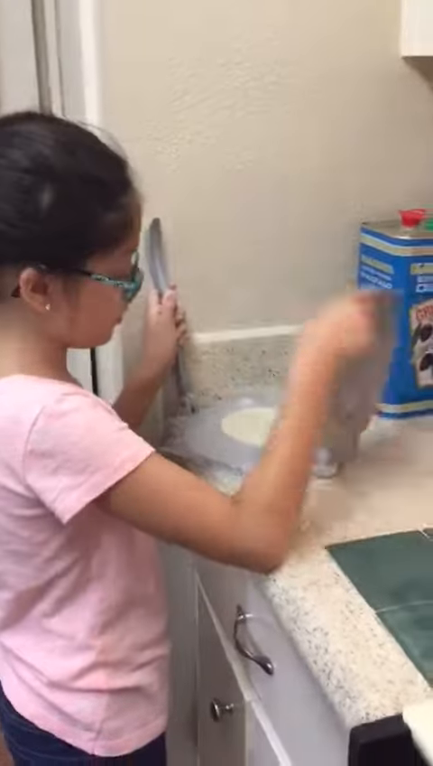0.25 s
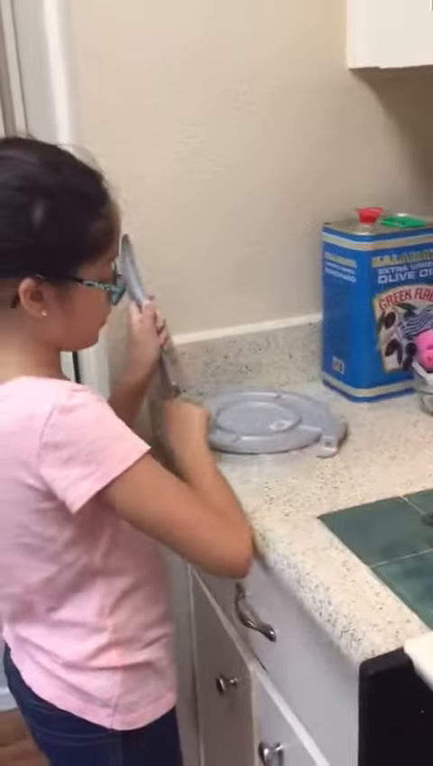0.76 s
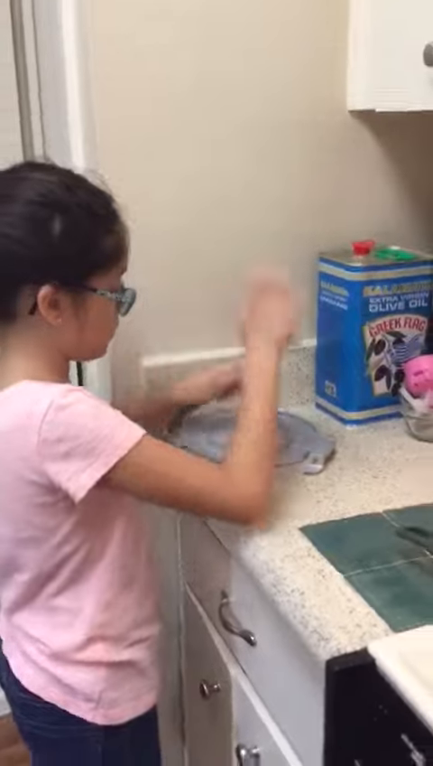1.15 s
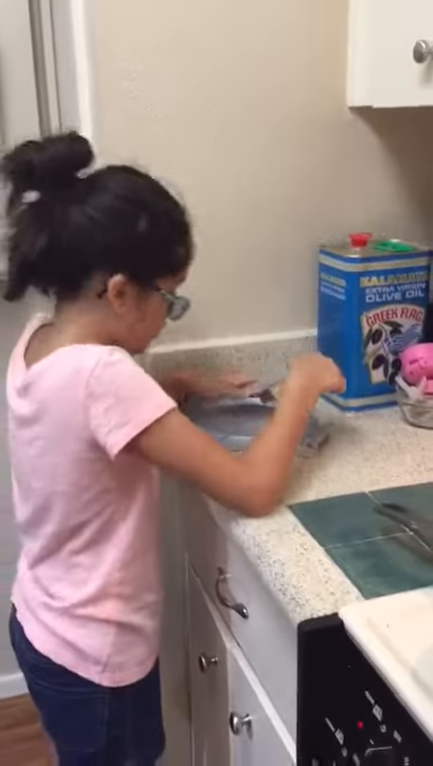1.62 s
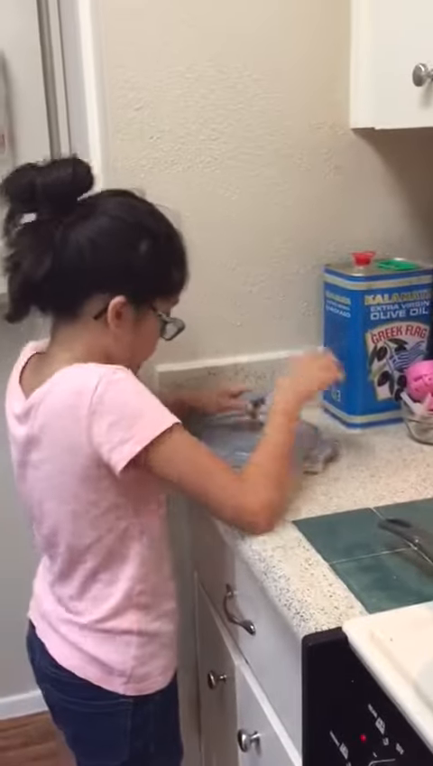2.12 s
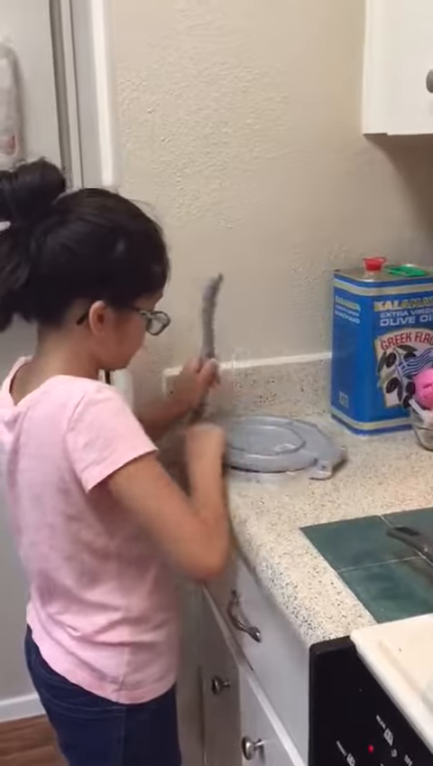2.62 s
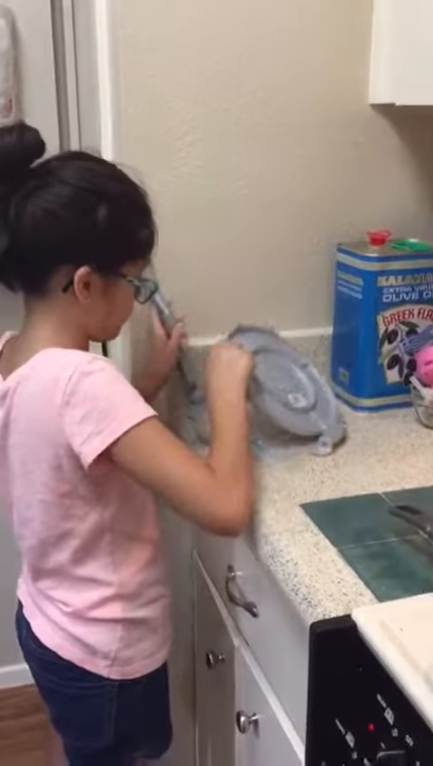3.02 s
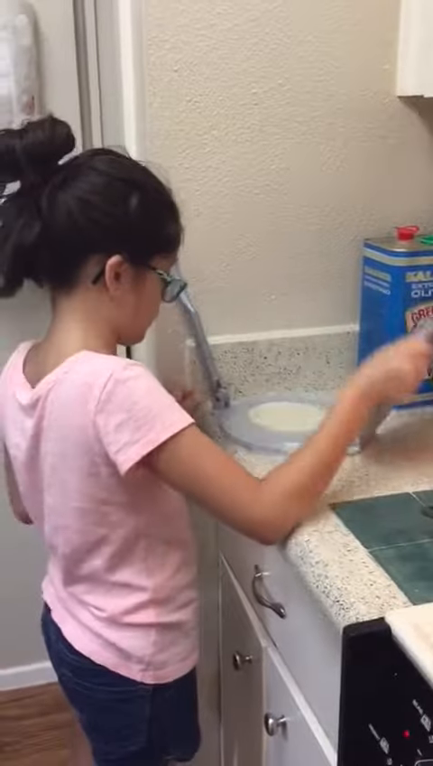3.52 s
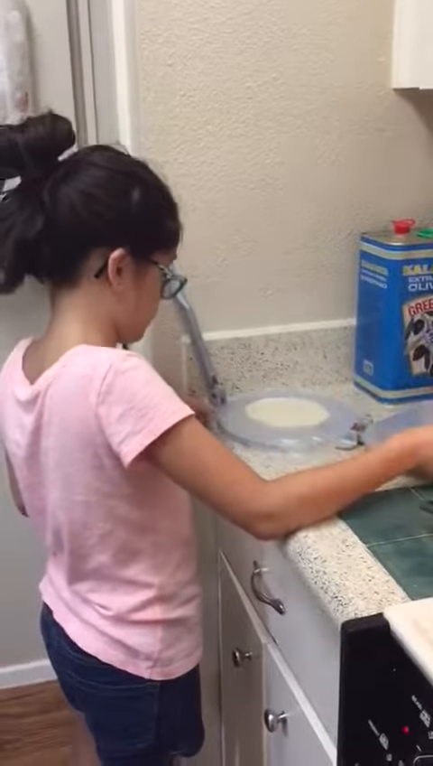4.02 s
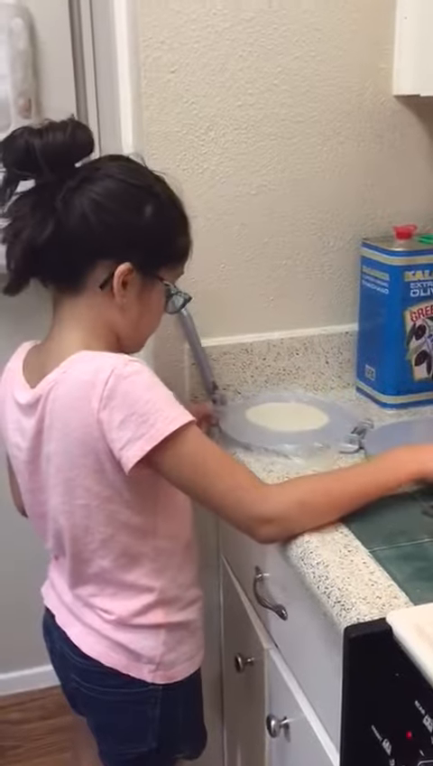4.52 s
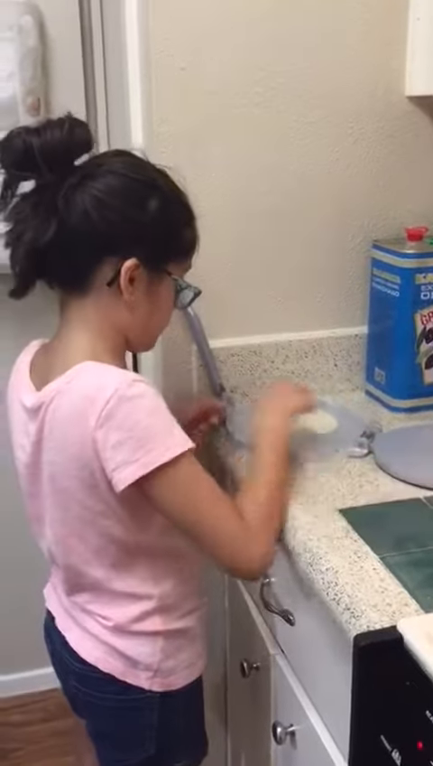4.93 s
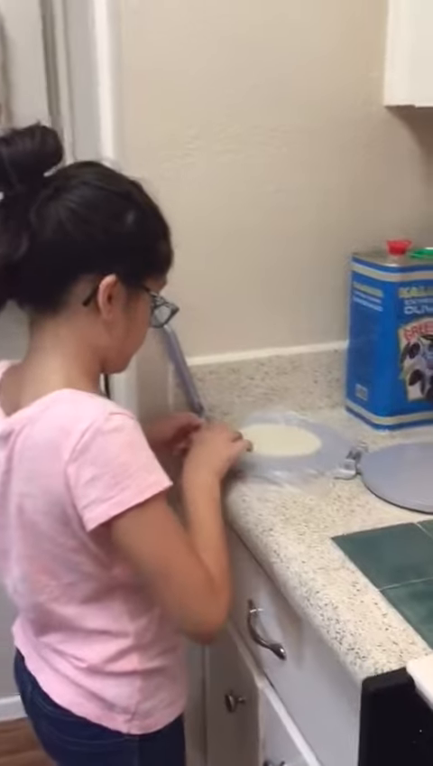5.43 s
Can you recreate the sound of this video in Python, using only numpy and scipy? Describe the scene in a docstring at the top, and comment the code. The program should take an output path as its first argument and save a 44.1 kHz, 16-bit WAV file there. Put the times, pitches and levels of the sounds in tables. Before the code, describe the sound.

A quiet kitchen with a low motor hum and soft air noise; mono, close to mid distance, short dense reflections from hard walls. From 0 to 0.3 s a dry metal hinge gives a high chirp, then a nasal squeal sliding into a rough, slowing creak. At 0.36-0.45 s the lid clacks, with a short squeak and thin, very high squeals until 0.7 s. A firm clack with a thump and plastic snap comes at 0.82 s, and a rattling cluster with a scrape at 1.3 s. Near-quiet until a double clack at 2.23 s, small knocks at 2.5-2.85 s and a sharp clack at 2.98 s. Around 3.5 s the hinge squeaks briefly and more softly; faint gritty grinding and ticks follow at 3.8-4.2 s. A clack at 4.57 s leads to the loudest ringing metal bang at 4.7 s, then faint plastic rustling until 5.7 s.

```python
"""A cast metal tortilla press is closed, levered down on dough and opened again on a kitchen counter.
Over a motor hum the dry hinge squeals and creaks by stick-slip friction as the lid swings over.
Lid and lever then clack as struck modes; plastic sheets rustle in fine snaps and the feet grate.
Later the hinge squeals again and grates, the lid drops open with a bang, and rustling ends the scene.
Hard walls reflect the clacks and the friction sounds in a dense decaying tail."""
import sys
import numpy as np
from scipy import signal
from scipy.io import wavfile
from scipy.ndimage import uniform_filter1d

SR = 44100
rng = np.random.default_rng(int(sys.argv[2]) if len(sys.argv) > 2 else 0)


def digitize_waveform(pressure):
    """Quantize a signal to 16-bit integers and store it at the path in sys.argv[1].

    Rows of a 2-D input are taken as channels; values are limited to [-1, 1].
    """
    field = np.atleast_2d(pressure).T
    bounded = np.clip(field, -1, 1)
    quanta = np.round(bounded * 32767).astype(np.int16)
    wavfile.write(sys.argv[1], SR, quanta)


N = 249595

# low hum of an appliance motor: [f/Hz, rms level/dB]
MOTOR_HUM = [(59.2, -56), (114.5, -53), (117.6, -58.5), (172.3, -59.5), (234, -83)]
# spectrum of the still air in the room: [f/Hz, relative density/dB per Hz]
AIR_SPECTRUM = [(15, -64.5), (25, -34.5), (43, -5.5), (85, -17.5), (118, 3), (145, -25), (177, -10),
                (314, -26.5), (394, -26.5), (447, -32), (857, -31), (3080, -39), (4160, -40), (10000, -46),
                (13000, -63.5), (22000, -120)]
AIR_LEVEL_DB = -53
# reverberation of the kitchen: [f/Hz, t60/s]
ROOM_DECAY = [(100, 0.41), (400, 0.22), (1000, 0.27), (3000, 0.26), (7000, 0.24), (10000, 0.15)]

# low thumps as weight comes onto the counter: [t/s, peak level/dB]
THUMP_EVENTS = [(0.364, -38), (.50, -33.5), (0.824, -27), (1.724, -38), (1.785, -50), (4.705, -24)]
# lowest modes of the counter: [f/Hz, relative level/dB, t60/s]
COUNTER_MODES = [(90.2, -5.5, 0.49), (131.4, 1.5, 0.34), (169, -2, 0.24), (200.3, -6, 0.26)]

# creasings of the plastic sheets: [t/s, length/s, level/dB]
RUSTLE_EVENTS = [(.42, 0.43, -63), (.812, 0.034, -28), (1.07, 0.076, -54.5), (2.17, 0.11, -61.5),
                 (2.68, 0.12, -49), (2.9, 0.28, -55.5), (3.365, 0.042, -55), (3.698, 0.026, -52.5),
                 (3.9, 0.24, -60), (4.2, 0.29, -64.5), (4.47, 0.32, -51.5), (4.78, 0.33, -56),
                 (5.36, 0.25, -57.5), (5.58, 0.15, -57)]
# shifts of the press on the counter: [t/s, length/s, level/dB]
SCRAPE_EVENTS = [(0, 0.017, -46.5), (.27, 0.26, -52.5), (.58, .42, -55), (1.04, 0.088, -54),
                 (1.255, 0.035, -54), (1.3, 0.094, -29.5), (1.47, 0.13, -64.5), (2.28, 0.34, -56),
                 (2.78, 0.2, -50.5), (3.05, 0.23, -63), (3.4, .25, -57), (4.5, 0.39, -50.5),
                 (4.75, 0.25, -53.5), (5.58, 0.13, -68.5)]
# spectrum of one plastic snap: [f/Hz, relative density/dB per Hz]
PLASTIC_SPECTRUM = [(800, -14), (2000, -2), (4500, -3.5), (8000, -2.5), (10000, -4)]

# nudges that turn the open lid on its hinge: [t/s, length/s, level/dB]
GRIND_EVENTS = [(3.803, 0.036, -58), (3.855, 0.019, -48.5), (3.925, 0.064, -43), (3.965, 0.087, -46.5),
                (4.044, 0.029, -38.5), (4.21, 0.12, -57), (4.49, .1, -60.5)]
# modes of the lid swinging free: [f/Hz, relative level/dB, t60/s]
LID_MODES = [(730, -2, 0.098), (1030, -3.5, .06), (1980, -3, .08), (1960, 4, 0.061), (3030, -3, 0.093),
             (3280, -0.5, 0.1), (4550, -15.5, 0.49), (6400, -14, .1)]

# the long creak as the lid swings over: [t/s, slip rate/Hz, level/dB, unevenness/0-1]
LONG_CREAK = [(.103, 715, -43, .05), (.126, 720, -37, .05), (.134, 712, -25, .05), (.175, 640, -24, .2),
              (.198, 330, -20, .3), (.220, 312, -24, .22), (.246, 309, -25, .22), (.275, 300, -30, .35),
              (.305, 200, -42, .4)]
# short creaks: [t/s, length/s, starting slip rate/Hz, glide/octaves, level/dB, unevenness/0-1,
# added treble gain/dB]
SHORT_CREAKS = [(.446, .03, 660, -.2, -24.5, .25, -29), (3.514, 0.079, 698, 0, -39.5, .008, 3.5),
                (4.044, 0.042, 1035, -.01, -46, 0.01, 14)]
# response of the hinge to its slips: [f/Hz, gain/dB]
HINGE_RESPONSE = [(200, -36), (480, -15.5), (700, -3), (950, -2), (1270, 2.5), (1620, -8), (2000, 1),
                  (2600, -8), (3300, -4.5), (5000, -17), (7000, -25), (10000, -35)]

# squeals of the hinge: [t/s, length/s, starting f/Hz, glide/octaves, level/dB, overtone level/dB]
SQUEAL_EVENTS = [(.021, 0.073, 4870, -0.069, -25.5, -9.5), (.102, 0.077, 730, -0.063, -23.5, -10.5),
                 (0.105, 0.073, 1440, -0.049, -23, -34), (.208, 0.053, 1248, -0.0037, -19, -34),
                 (0.44, 0.033, 1220, 0.14, -22, -33), (0.472, 0.067, 1340, 0.025, -38.5, -31.5),
                 (0.499, 0.024, 9230, -0.044, -17.5, -60), (0.52, 0.2, 9150, 0.0058, -49, -60),
                 (0.575, 0.037, 7930, 0, -29.5, -62), (.612, 0.1113, 7788, 0.019, -23, -60),
                 (3.478, 0.022, 1207, -0.047, -34, -31), (3.49, 0.073, 2720, -0.022, -37.5, -30),
                 (3.51, 0.033, 2756, -0.033, -27.5, -28), (3.542, .016, 2848, -0.074, -23, -22),
                 (3.542, 0.031, 3000, 0.0039, -38, -21), (3.555, 0.051, 2700, 0.0356, -34.5, -23.5),
                 (3.603, 0.04, 1315, 0.0024, -45.5, -22), (3.501, 0.082, 630, -0.024, -39.5, -35),
                 (4.538, 0.016, 7050, 0.05, -44.5, -66.5)]

# envelope of a friction stroke: [peak position/share of length, level at start/dB, level at end/dB]
RUSTLE_ENVELOPE = (.35, -10, -14)
SCRAPE_ENVELOPE = (0.86, -1.5, -16.5)
GRIND_ENVELOPE = (.25, -8, -11.5)
CREAK_ENVELOPE = (0.083, -3.5, -25.5)
SQUEAL_ENVELOPE = (0.55, -10, -11.5)

# blows of lid and lever: [t/s, clack level/dB, then re the clack: counter thud/dB, hollow knock/dB,
# treble/dB; last, metal ring re the knock before the bands are balanced/dB]
BLOW_EVENTS = [(0.362, -34, -18.5, -10, -17, -10.5), (.417, -29, -13, -8.5, -12.5, 0),
               (.447, -36, -7.5, -25.5, 0.5, -10.5), (0.64, -47.5, -12, -7.5, -17.5, 2),
               (.734, -43.5, -12.5, -26, -6, -5.5), (.819, -26.5, -21, -8.5, 3, -7.5),
               (0.827, -24.5, -16.5, -3.5, -24, -2.5), (1.102, -53.5, -11, -6, -5.5, -5),
               (1.128, -47, -18, -6.5, -28, -3), (1.281, -30.5, -7.5, -25, 4, -6),
               (1.301, -30.5, 0.5, 2, -22, 9), (1.341, -27, -12, -6, -10, -9.5),
               (1.385, -31.5, 0.5, 2, -12, -4.5), (2.229, -24, -7.5, -1.5, -17.5, -4.5),
               (2.236, -23, -23, -7, -21.5, 1.5), (2.256, -38.5, -18, -11, -3, -20),
               (2.365, -48, -5.5, -2.5, -8, -25.5), (2.502, -36.5, -6.5, 1, -34, -5),
               (2.536, -47.5, 6.5, -1, -19.5, 1), (2.651, -38, -12, 0, -4, -25),
               (2.664, -33.5, 2, 2, -13, -7), (2.834, -34.5, -6.5, -4, -7.5, -1),
               (2.978, -18.5, -16.5, -22.5, -5.5, -5.5), (3.424, -49.5, 5, 2.5, -26, -3.5),
               (3.904, -48.5, -2, -11, -8.5, -5.5), (3.932, -45, -3, 2.5, -12.5, -11),
               (4.142, -38, -9, -3, -25, -10.5), (4.565, -23.5, -10.5, -6.5, -12.5, -9.5),
               (4.576, -24, -27.5, -18.5, -4, 0.5), (4.704, -17.5, -4.5, -5.5, 2.5, 7),
               (4.711, -11.5, -11, -13.5, -9, -3.5), (4.729, -20.5, -10.5, -12.5, -5.5, -6.5)]
# spectrum of metal contact: [f/Hz, relative density/dB per Hz]
CLACK_SPECTRUM = [(35, -37), (60, -15.5), (175, -9.5), (263, -10), (412, 0), (521, -7), (970, -8),
                  (1280, -9), (1970, -8.5), (2490, -14.5), (3430, -14), (4830, -19.5), (7410, -24.5),
                  (8790, -29), (10000, -35.5), (13000, -55.5), (22000, -120)]
# modes of the press and the counter under it: [f/Hz, relative level/dB, t60/s]
PRESS_MODES = [(131.3, -2.5, 0.19), (175.5, -2.5, 0.32), (320, -6, 0.29), (409.6, 1.5, 0.21),
               (701.4, -0.5, 0.24), (811, -0.5, 0.23), (964.3, -7, 0.16), (967, 0.5, 0.094),
               (1166, -5.5, 0.16), (1237, -8, 0.095), (1418, -1.5, 0.19), (1690, -16, .18),
               (1785, -6, 0.29), (1936, 1.5, 0.2), (2300, -17.5, .16), (3030, -5, 0.073),
               (3590, -11.5, .15), (6580, -16.5, 0.17), (6790, -19, 0.08), (7590, -21.5, 0.28),
               (8530, -21.5, 0.25), (9530, -11, .16), (10180, -18, 0.23)]


def amp(db):
    """Level law: decibels to amplitude gain."""
    return 10 ** (np.asarray(db) / 20)


def evened(x):
    """Normalisation of mean power: scales to rms 1."""
    return x / np.sqrt(np.mean(x ** 2) + 1e-20)


def read(points, hz):
    """Interpolation of a spectrum along a log-frequency axis."""
    f, value = np.transpose(points)
    return np.interp(np.log(hz + 1), np.log(f + 1), value)


def follow(rows, t):
    """Linear interpolation of each column of a curve at the times t."""
    s, *columns = np.transpose(rows)
    return [np.interp(t, s, c) for c in columns]


def add(mix, s, sound):
    """Superposition: adds a sound to the mix at s seconds."""
    part = mix[max(round(s * SR), 0):][:len(sound)]
    part += sound[:len(part)]


def colour(x, points, size=4096):
    """Minimum-phase filtering: the log gain and the phase form a Hilbert pair, so it is causal."""
    log_gain = np.log(amp(read(points, abs(np.fft.fftfreq(size, 1 / SR)))))
    taps = np.fft.ifft(np.exp(np.conj(signal.hilbert(log_gain)))).real
    return signal.fftconvolve(x, taps[:size // 2])[:len(x)]


def band(x, lo_hz, hi_hz):
    """Causal Butterworth band-pass filtering."""
    sos = signal.butter(3, [lo_hz, hi_hz], "band", fs=SR, output="sos")
    return signal.sosfilt(sos, x)


def drift(n, size):
    """Smoothed noise: slow random variation of rms 1, averaged twice over size samples."""
    smooth = uniform_filter1d(rng.standard_normal(n), size)
    return evened(uniform_filter1d(smooth, size))


def modes(table, t):
    """Modal superposition: a sum of exponentially decaying sinusoids."""
    return sum(amp(db - 60 * t / t60) * np.sin(2 * np.pi * hz * t) for hz, db, t60 in table)


def grains(per_s, spread_db):
    """Random impulse train; a positive spread gives a few large snaps, a negative one a few small."""
    present = rng.random(N) < per_s / SR
    sign = rng.choice([-1, 1], N)
    return present * sign * amp(spread_db * np.minimum(rng.exponential(1, N), 4))


def stroke(length, shape, taper=.12):
    """Envelope of one stroke of friction: it swells to a peak and eases off."""
    peak, start_db, end_db = shape
    u = np.linspace(0, 1, max(round(length * SR), 2))
    level_db = np.interp(u, [0, np.clip(peak, 0, 1), 1], [start_db, 0, end_db])
    return amp(level_db) * signal.windows.tukey(len(u), taper)


def strokes(rows, shape):
    """Superposition of the envelopes of a series of strokes."""
    out = np.zeros(N)
    for s, length, db in rows:
        add(out, s, amp(db) * stroke(length, shape))
    return out


def glide(hz, octaves, n):
    """Exponential frequency glide, even in pitch, over n samples."""
    return hz * 2 ** np.linspace(0, octaves, n)


def kitchen(x, direct_db, size=24000):
    """Reverberation: direct sound, then dense reflections with a frequency-dependent decay."""
    taps = rng.standard_normal(size) * (rng.random(size) < .2)
    hz, t, z = signal.stft(taps, SR, nperseg=256)
    decay = amp(-60 * t / read(ROOM_DECAY, hz)[:, None])
    tail = signal.istft(z * decay, SR, nperseg=256)[1]
    tail *= 1 - np.exp(-np.arange(len(tail)) / SR / 0.00067)  # build-up time in s
    tail /= np.linalg.norm(tail)
    tail[0] += amp(direct_db)  # direct sound re the energy of the reflections
    return signal.fftconvolve(x, tail / np.linalg.norm(tail))[:len(x)]


def background(waver=0.06):
    """Stationary noise: a motor's partials waver in level and phase over coloured air noise."""
    t = np.arange(N) / SR
    hum = np.zeros(N)
    for hz, db in MOTOR_HUM:
        level = amp(db) * np.sqrt(2) * (1 + waver * drift(N, size=5000))
        hum += level * np.sin(2 * np.pi * hz * t + 2.9 * drift(N, size=9000))
    air = evened(colour(rng.standard_normal(N), AIR_SPECTRUM))
    return hum + amp(AIR_LEVEL_DB) * air


def thumps(size=16000):
    """Modal excitation by a push: weight stirs the lowest modes of the counter."""
    out, t = np.zeros(N), np.arange(size) / SR
    push = modes(COUNTER_MODES, t) * (1 - np.exp(-t / .006))  # soft onset
    for s, db in THUMP_EVENTS:
        add(out, s, amp(db) * push / abs(push).max())
    return out


def rubbing():
    """Granular friction: plastic creases snap in fine grains, the cast feet grate on the counter."""
    snaps = colour(grains(per_s=400, spread_db=3.0), PLASTIC_SPECTRUM)
    plastic = evened(snaps) * strokes(RUSTLE_EVENTS, RUSTLE_ENVELOPE)
    scrape = band(colour(grains(per_s=1500, spread_db=-0.5), CLACK_SPECTRUM), 230, 3200)
    grate = evened(scrape) * strokes(SCRAPE_EVENTS, SCRAPE_ENVELOPE)
    return kitchen(plastic + grate, direct_db=-5.5)


def grinding(per_s=450, catch_db=4, size=9000):
    """Friction-driven resonance: irregular catches of dry metal in the hinge ring the lid's modes."""
    ring = modes(LID_MODES, np.arange(size) / SR)
    catches = grains(per_s, spread_db=-6.0) * amp(catch_db * drift(N, size=600))
    grit = evened(catches) * strokes(GRIND_EVENTS, GRIND_ENVELOPE)
    return kitchen(signal.fftconvolve(grit, ring / np.linalg.norm(ring))[:N], direct_db=10.0)


def creak(rate, uneven):
    """Stick-slip pulse train: jittered slips at the given rate, with grit, drive the hinge's response."""
    jitter = np.exp(.42 * uneven * drift(SR, size=50)[:len(rate)])
    turns = np.cumsum(rate * jitter) / SR
    slips = np.diff(np.floor(turns), prepend=0) * np.sqrt(SR / rate)  # equal power at any rate
    grit = 1.5 * uneven * rng.standard_normal(SR)[:len(rate)]
    return evened(colour(slips + grit, HINGE_RESPONSE))


def creaks():
    """Stick-slip under load: in the long swing the slips slow and grow uneven."""
    out = np.zeros(N)
    t = np.arange(LONG_CREAK[0][0], LONG_CREAK[-1][0], 1 / SR)
    rate, db, uneven = follow(LONG_CREAK, t)
    add(out, t[0], amp(db) * creak(rate, uneven))
    for s, length, rate, octaves, db, uneven, treble_db in SHORT_CREAKS:
        gain = stroke(length, CREAK_ENVELOPE)
        slips = creak(glide(rate, octaves, len(gain)), uneven)
        treble = amp(treble_db) * band(slips, 4000, 11000)
        add(out, s, amp(db) * gain * evened(slips + treble))
    return kitchen(out, direct_db=4.5)


def squeals(waver_hz=22, skip_share=.003, chatter_db=1.5):
    """Self-excited oscillation: the slipping dry hinge pin sings a wavering, chattering near-pure tone."""
    out = np.zeros(N)
    for s, length, hz, octaves, db, overtone_db in SQUEAL_EVENTS:
        gain = stroke(length, SQUEAL_ENVELOPE)
        n = len(gain)
        waver = waver_hz * drift(SR, size=50)[:n]
        skips = skip_share * hz * drift(SR, size=16)[:n]
        phase = 2 * np.pi * np.cumsum(glide(hz, octaves, n) + waver + skips) / SR
        overtones = sum(np.sin(k * phase) for k in (2, 3) if k * hz < SR / 2)
        tone = np.sin(phase) + amp(overtone_db) * overtones
        chatter = amp(chatter_db * drift(SR, size=110)[:n])
        add(out, s, amp(db) * gain * evened(tone * chatter))
    return kitchen(out, direct_db=2.5)


def blow(clack_db, thud_db, hollow_db, treble_db, ring_db, contact_s=0.0018, size=26000):
    """Impact: a brief metal chatter fills the room and rings the press; each blow sets its own bass and treble."""
    t = np.arange(size) / SR
    early = t < .025  # levels refer to the first 25 ms
    chatter = rng.standard_normal(size) * np.exp(-t / contact_s) * 0.3
    chatter[0] += 1
    knock = kitchen(colour(chatter, CLACK_SPECTRUM), direct_db=-9.5)

    hz, db, t60 = np.transpose(PRESS_MODES)[:, :, None]
    # random detuning: each blow rings the modes at slightly different pitches
    hz = hz * (1 + 0.0044 * rng.standard_normal(hz.shape))
    # random level and sign of each mode, so the ring's timbre varies from blow to blow
    share = amp(1.5 * rng.standard_normal(hz.shape)) * rng.choice([-1, 1], hz.shape)
    ring = (share * amp(db - 60 * t / t60) * np.sin(2 * np.pi * hz * t)).sum(0)
    ring *= 1 - np.exp(-t / 0.0016)  # soft onset

    sound = knock / knock[early].std() + amp(ring_db) * ring / ring[early].std()
    thud, hollow = band(sound, 65, 230), band(sound, 230, 620)
    clack, treble = band(sound, 620, 2500), band(sound, 2500, 12000)
    balance = (thud_db, thud), (hollow_db, hollow), (0, clack), (treble_db, treble)
    return amp(clack_db) * sum(amp(db) * part / part[early].std() for db, part in balance)


def blows():
    """Successive impacts: lid and lever strike the base and the counter."""
    out = np.zeros(N)
    for s, *strike in BLOW_EVENTS:
        add(out, s, blow(*strike))
    return out


def scene():
    """Superposition of the room, the plastic sheets and the press."""
    friction = rubbing() + grinding() + creaks() + squeals()
    return (background() + thumps() + friction + blows())[None]


def record(dry, overload=.88, edge_hz=10300):
    """Transducer limits: high-pass at 45 Hz, hard clipping at the overload point, then low-pass."""
    heard = signal.sosfilt(signal.butter(4, 45, "high", fs=SR, output="sos"), dry)
    low_pass = signal.firwin(161, edge_hz, window=("kaiser", 8), fs=SR)[None]
    return signal.oaconvolve(np.clip(heard, -overload, overload), low_pass, "same")


dry = scene()
out = record(dry)
digitize_waveform(out)
```